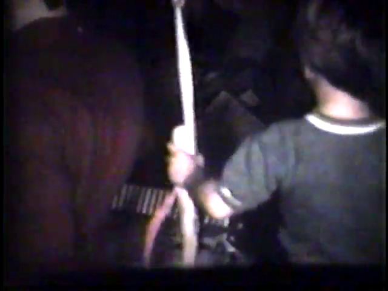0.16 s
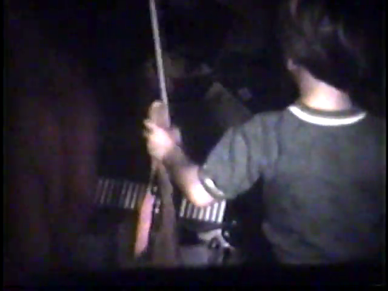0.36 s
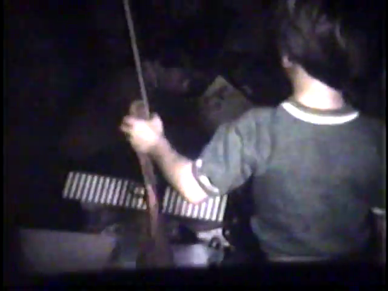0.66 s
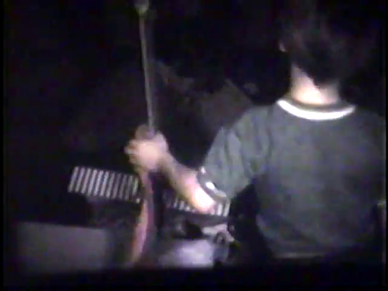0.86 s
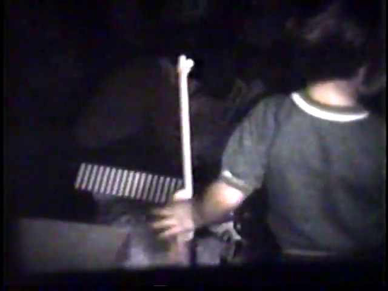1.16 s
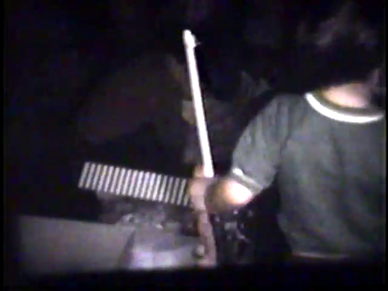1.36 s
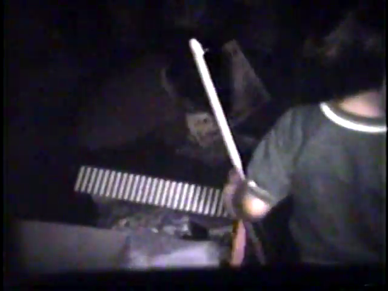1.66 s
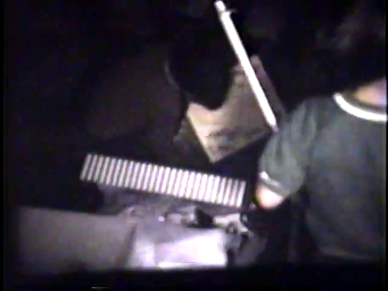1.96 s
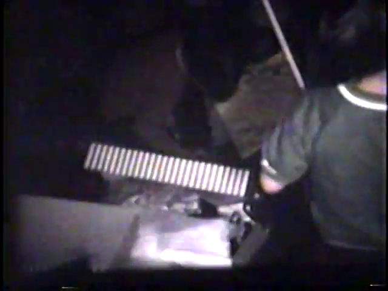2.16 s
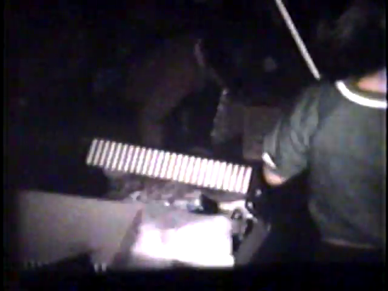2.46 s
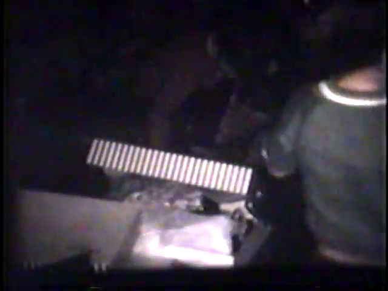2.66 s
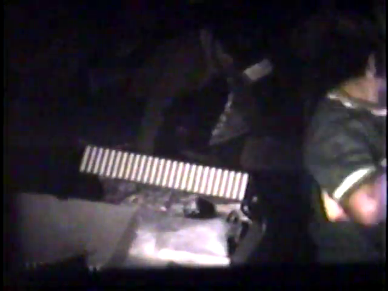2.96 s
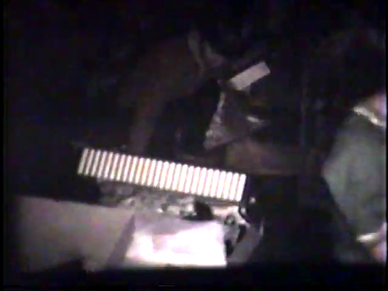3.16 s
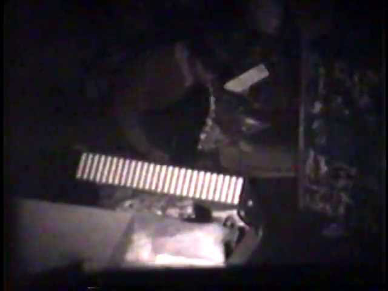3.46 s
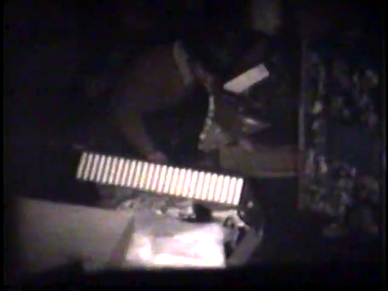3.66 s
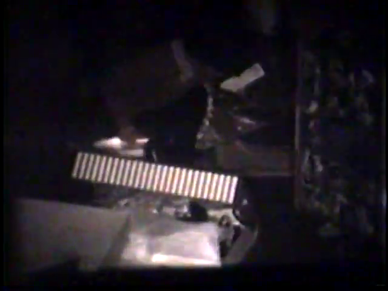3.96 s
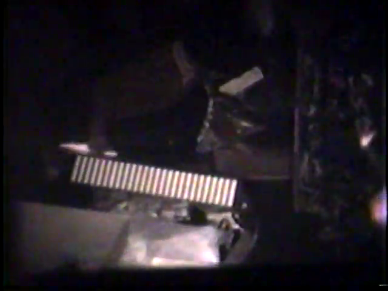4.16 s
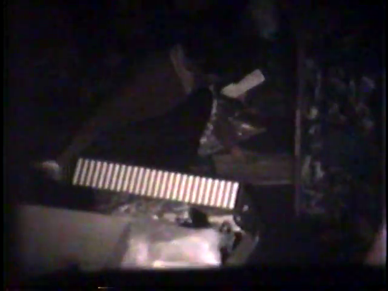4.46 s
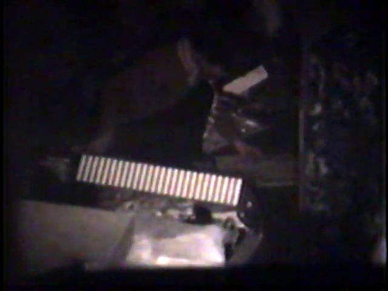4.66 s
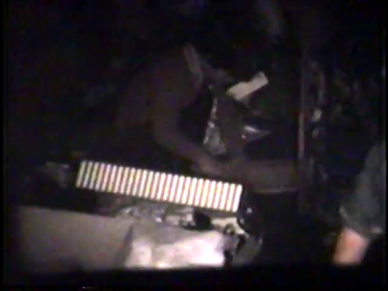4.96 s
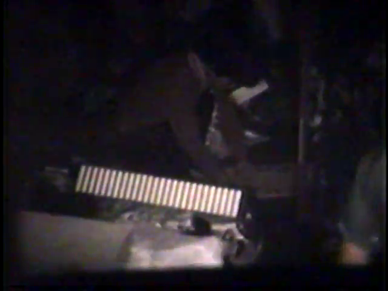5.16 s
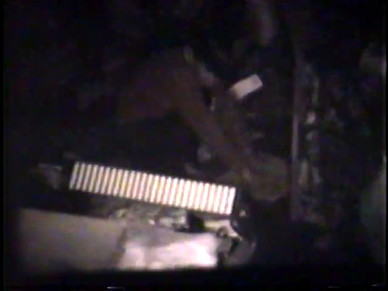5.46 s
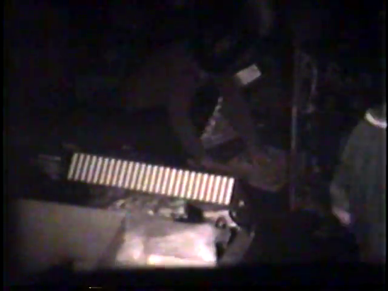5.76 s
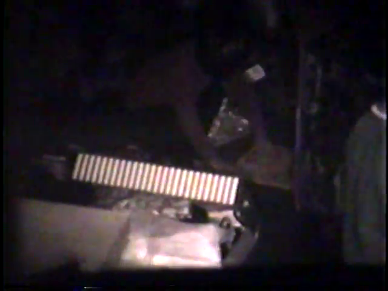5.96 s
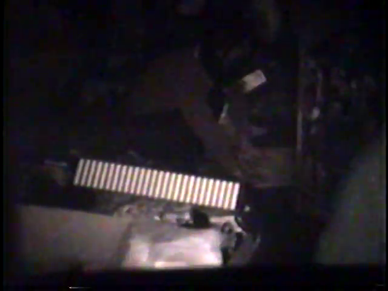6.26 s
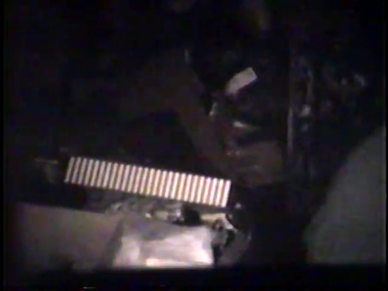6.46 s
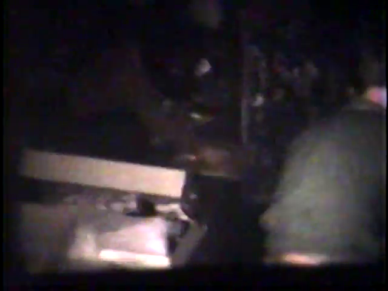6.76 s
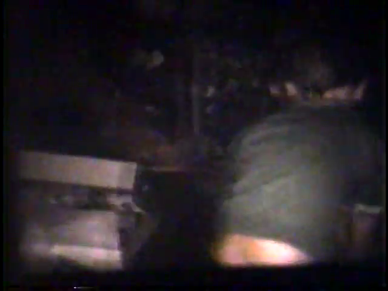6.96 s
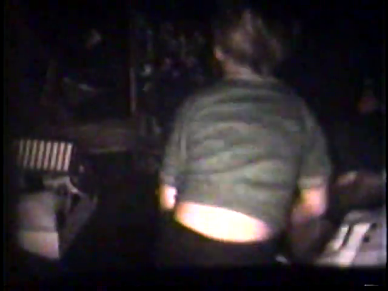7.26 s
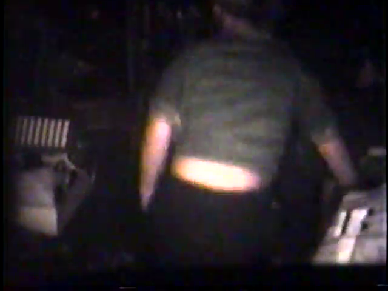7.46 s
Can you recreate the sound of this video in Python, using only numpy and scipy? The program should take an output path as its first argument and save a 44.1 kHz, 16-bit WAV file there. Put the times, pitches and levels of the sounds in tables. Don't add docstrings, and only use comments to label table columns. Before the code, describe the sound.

A small film projector runs at steady speed in a room, very close to a camcorder microphone. A rough motor hum with a fluttering casing rattle fills the foreground, with rapid identical clicks about seventeen times a second. Fan air hisses underneath, and a slight squeak swells about once a second. The mono sound is dulled on top and continues unchanged from start to finish.

```python
import sys
import numpy as np
from scipy import signal
from scipy.fft import rfft, irfft, next_fast_len
from scipy.io import wavfile

SR = 44100
rng = np.random.default_rng(int(sys.argv[2]) if len(sys.argv) > 2 else 0)


def boost_factor(decibels):
    exponent = np.asarray(decibels, float) / 20
    return 10 ** exponent


def transcribe(signal):
    frames = np.atleast_2d(signal).T
    limited = np.clip(frames, -1, 1)
    pcm = np.round(limited * 32767).astype(np.int16)
    wavfile.write(sys.argv[1], SR, pcm)


N = 335601

PULL_HZ, ROTOR_HZ, FRAME_HZ = 120.0115, 53.7728, 17.201
PULL_START_TURNS, ROTOR_START_TURNS = .29, -.32
ROTOR_BARS, FRAMES_PER_SPROCKET = 17, 18


def at_hz(points, hz):
    points = np.array(points)
    return np.interp(np.log(hz + 1), np.log(points[:, 0]), points[:, 1])


def drift(rate):
    r = np.exp(-80 * np.pi * rate / SR)
    noise = rng.standard_normal(N // 40 + 4002)
    slow = signal.lfilter([1], [1, -2 * r, r * r], noise)[4000:]
    slow = (slow - slow.mean()) / slow.std()
    return np.interp(np.arange(N) / 40, np.arange(len(slow)), slow)


def coloured(x, response):
    size = next_fast_len(N + 8192)
    hz = np.arange(size // 2 + 1) * SR / size
    return irfft(rfft(x, size) * response(hz), size)[:N] * np.sqrt(SR / 2)


def resonance(hz, centre_hz, width_hz, db):
    damping = 1j * hz * width_hz
    return -boost_factor(db) * (damping / (centre_hz ** 2 - hz ** 2 + damping)) ** 2


def ring(clicks, modes):
    out = np.zeros(N)
    for k, (hz, db, t60) in enumerate(modes):
        r = boost_factor(-60 / (t60 * SR))
        w = 2 * np.pi * hz / SR
        strength = (-1) ** (k // 3) * boost_factor(db) * np.sin(w)
        out += signal.lfilter([0, strength], [1, -2 * r * np.cos(w), r * r], clicks + 1e-18)
    return out


def motor_angle(pulls, turns):
    s = np.arange(N) / SR
    pull = PULL_HZ * s + PULL_START_TURNS
    rotor = ROTOR_HZ * s + ROTOR_START_TURNS
    return 2 * np.pi * (round(pulls) * pull + round(turns) * rotor)


# centre in Hz, width in Hz, level in dB per Hz.
CASING_PANELS = [(296, 98, -66), (440.4, 96, -64), (542.6, 50, -54), (740, 111, -63), (800, 85, -63),
                 (902, 81, -59.5), (1029, 35, -61), (1083.6, 39, -60), (1180, 59, -73), (1274.7, 40.6, -59),
                 (1519, 92, -57.5), (1706, 145, -67), (1880, 36.5, -63)]


def casing(hz, panels=CASING_PANELS):
    return sum(resonance(hz, *mode) * (-1) ** k for k, mode in enumerate(panels))


def side_tones(strong):
    size = next_fast_len(2 * N)
    spectrum = np.zeros(size // 2 + 1, complex)
    for turns in range(-8, 23):
        away = min(abs(turns), abs(turns - ROTOR_BARS) + 2, 5)
        for pulls in range(-8, 20):
            hz = pulls * PULL_HZ + turns * ROTOR_HZ
            chance, lag = rng.standard_normal(), rng.random()
            if 280 < hz < 1900 and (pulls, turns) not in strong:
                db = 11.0 - 1.42 * away + 2.5 * chance
                tone = abs(casing(hz)) * boost_factor(db) * np.exp(2j * np.pi * lag)
                spectrum[round(hz * size / SR)] = tone
    return irfft(spectrum, size)[:N] * size / np.sqrt(2)


# multiple of pull, multiple of rotor turn, level in dB rms.
MOTOR_TONES = [(2, 0, -45.3), (2, 1, -49.0), (3, 0, -39.3), (3, 1, -32.3), (4, -1, -36.6), (0, 8, -45.7),
               (3, 2, -43.5), (4, 0, -45.4), (4, 1, -37.4), (5, -1, -32.9), (6, -3, -50.0), (4, 2, -49.1),
               (5, 0, -38.8), (6, 0, -46.3), (7, -1, -46.8), (7, 0, -49.1), (6, 3, -44.5), (7, 1, -46.0),
               (8, -1, -47.6), (0, 19, -48.5), (9, -1, -46.8), (1, 18, -47.1), (13, -1, -44.0),
               (14, -3, -49.2), (14, -2, -49.2), (4, 19, -50.2), (11, 4, -52.3), (12, 2, -51.8),
               (8, 2, -51.0), (1, 8, -48.0)]
# multiple of pull added to the bar rate, level in dB rms.
ROTOR_BAR_TONES = [(-4, -50.5), (-3, -42.1), (-1, -50.8), (0, -45.1), (1, -46.9), (2, -50.6), (3, -49.7),
                   (5, -46.3)]
OPPOSED_TONES = [(2, 1), (4, 2), (6, 3), (4, 19), (14, -3), (12, 2)]


def hum():
    strong = MOTOR_TONES + [(pulls, ROTOR_BARS, db) for pulls, db in ROTOR_BAR_TONES]
    groups = np.zeros((4, N))
    panel_lag = rng.random(20)
    for k, (pulls, turns, db) in enumerate(strong):
        hz = pulls * PULL_HZ + turns * ROTOR_HZ
        opposed = (pulls, turns) in OPPOSED_TONES
        side_panel = abs(hz - 545) < 20 and turns < 4
        lag = .2 - .39 * side_panel - .25 * (hz < 300 or opposed)
        if hz > 610:
            lag = panel_lag[int(hz / PULL_HZ)]
        lag += .5 * opposed
        groups[k % 4] += np.sqrt(2) * boost_factor(db) * np.cos(motor_angle(pulls, turns) + 2 * np.pi * lag)
    wobbling = sum(group * boost_factor(0.14 * drift(2.6)) for group in groups)
    return wobbling + side_tones([row[:2] for row in strong])


def grains(per_s, spread_db):
    happens = rng.random(N) < per_s / SR
    size = boost_factor(spread_db * np.minimum(rng.exponential(1, N), 4))
    hits = happens * size * rng.choice([-1, 1], N)
    return hits / hits.std()


def sprocket_rub():
    turn = np.arange(N) / SR * FRAME_HZ / FRAMES_PER_SPROCKET
    before = (.515 - turn) % 1
    off = np.minimum(before, 1 - before)
    drag_db = 2.5 * np.exp(-before / 0.35)
    catch_db = 8.0 * np.exp(-off / .03)
    return boost_factor(0.2 + drag_db + catch_db + 0.64 * drift(4.6))


# multiple of pull, multiple of rotor turn, swing in dB, lag in turns.
BEARING_LEAN = [(0, 1, 1.7, 0), (1, -1, 2.2, 0), (1, -2, 1.8, 0), (1, 0, .7, -.15), (2, 1, .8, 0),
                (-7, 16, .4, 0), (2, -5, .7, .05), (3, -7, .7, .3), (-4, 9, .6, -.3), (5, -11, .8, -.4),
                (3, -6, .6, .1), (1, -3, .4, .4), (2, -4, .4, .2), (6, -13, .4, -.2)]
# centre in Hz, width in Hz, level in dB per Hz.
LAMP_COVER = [(2600, 380, -81), (3093, 41, -77), (3720, 500, -75), (4240, 940, -82), (5200, 120, -75.5),
              (6110, 390, -91.5), (6690, 210, -83.5), (7140, 150, -94), (7740, 170, -87),
              (8260, 205, -82.5), (9220, 370, -87.5)]
# frequency in Hz, level in dB per Hz.
LOOSE_CHATTER = [(150, -110), (1000, -78), (2000, -104), (2500, -76), (3300, -98.5), (5000, -77.5),
                 (5700, -97.5), (9600, -88), (10200, -100), (14000, -114)]


def rattle():
    lean_db = .6 * drift(8) + .5 * drift(3)
    for pulls, turns, db, lag in BEARING_LEAN:
        lean_db += db * np.cos(motor_angle(pulls, turns) + 2 * np.pi * lag)
    lean = boost_factor(lean_db) / np.sqrt(np.mean(boost_factor(lean_db) ** 2))
    contacts = lean * grains(6000, spread_db=2.5)
    heavy = coloured(contacts * lean ** (.3 - 1), casing)
    cover = coloured(contacts, lambda hz: casing(hz, LAMP_COVER))
    loose = lean ** 1.18 * grains(6000, spread_db=-3.0)
    chatter = coloured(loose, lambda hz: boost_factor(at_hz(LOOSE_CHATTER, hz)))
    squeak = coloured(sprocket_rub() * contacts, lambda hz: resonance(hz, 4830, 163, -69))
    return heavy + cover + chatter + squeak


# place in the frame from 0 to 1, then thud, gate plate, pin and lever levels in dB.
CLAW_CONTACTS = [(0.031, -60, -50, -67, -50), (.378, -32, -54, -43.5, -64), (.415, -27, -35.5, -36, -60),
                 (0.456, -29, -37, -65, -50), (.485, -37.5, -40.5, -59, -56), (.52, -33, -63, -47, -46),
                 (0.554, -29, -69, -59, -65), (0.721, -27, -52, -56, -41), (.855, -25, -41.5, -70, -42),
                 (.91, -24, -28.5, -62, -49), (.93, -31, -43, -47, -64), (.965, -47, -33, -44, -40)]
# frequency in Hz, level in dB, time to fall 60 dB in seconds.
THUD_MODES = [(836, -7, 0.044), (1150, -4, 0.019), (1367, -2, 0.0091)]
# frequency in Hz, level in dB, time to fall 60 dB in seconds.
PLATE_MODES = [(2078, -4, 0.045), (2125, -6.5, 0.011), (2254, -5, 0.033), (2622, -12.5, 0.031)]
# frequency in Hz, level in dB, time to fall 60 dB in seconds.
PIN_MODES = [(6110, -0.5, 0.01), (6640, -10.5, 0.01)]
# frequency in Hz, level in dB, time to fall 60 dB in seconds.
LEVER_MODES = [(3020, -0.5, 0.02)]


def claw():
    frames = np.arange(-1, int(N / SR * FRAME_HZ) + 1)
    wander_s = .0003 * drift(.5)
    out = np.zeros(N)
    for column, modes in enumerate((THUD_MODES, PLATE_MODES, PIN_MODES, LEVER_MODES)):
        clicks = np.zeros(N)
        for place, *levels_db in CLAW_CONTACTS:
            chance = rng.standard_normal((len(frames), 2))
            at = ((frames + place) / FRAME_HZ + .00002 * chance[:, 0]) * SR
            at = (at + wander_s[np.clip(at, 0, N - 1).astype(int)] * SR).astype(int)
            inside = (at >= 0) & (at < N)
            clicks[at[inside]] += boost_factor(levels_db[column] + 0.72 * chance[inside, 1])
        soft = signal.butter(4, 1.13 * max(modes)[0], fs=SR, output="sos")
        out += ring(signal.sosfilt(soft, clicks), modes)
    return signal.sosfilt(signal.butter(2, 500, "high", fs=SR, output="sos"), out)


# frequency in Hz, level in dB per Hz.
FAN_AIR = [(20, -70.5), (100, -84), (190, -80), (280, -68), (600, -70.5), (1000, -74), (2000, -74.5),
           (3000, -82.5), (5500, -88), (9600, -125), (10300, -102), (13000, -108), (15500, -122)]


def fan():
    return coloured(rng.standard_normal(N), lambda hz: boost_factor(at_hz(FAN_AIR, hz)))


def scene():
    return (hum() + rattle() + claw() + fan())[None]


# time in seconds, level in dB.
GAIN_JOLTS = [(0.049, -46), (0.239, -39), (0.299, -48), (0.543, -43), (1.51, -46), (1.69, -47),
              (2.008, -39), (2.375, -39), (3.283, -40), (3.668, -39), (4.073, -42), (4.563, -37),
              (4.707, -34), (5.52, -38), (6.076, -38), (6.249, -44), (6.765, -38), (6.809, -49),
              (7.445, -38)]


def gain_thump(x):
    kick = .3 * np.maximum(np.abs(x) - .13, 0)
    kick[[int((at + .022) * SR) for at, db in GAIN_JOLTS]] += boost_factor(np.array(GAIN_JOLTS)[:, 1] + 56.5)
    kick = signal.sosfilt(signal.butter(2, 120, fs=SR, output="sos"), kick)
    return signal.sosfilt(signal.butter(1, [5, 22], "band", fs=SR, output="sos"), kick)


# frequency in Hz, level in dB rms.
LEAK_TONES = [(29.97, -64), (60.003, -50), (89.92, -70), (119.88, -70), (120.025, -69), (149.84, -67),
              (180.01, -68), (15734.3, -96)]


def leakage():
    s = np.arange(N) / SR
    tones = sum(np.sqrt(2) * boost_factor(db) * np.sin(2 * np.pi * hz * s) for hz, db in LEAK_TONES)
    return tones + coloured(rng.standard_normal(N), lambda hz: resonance(hz, 15730, 300, -112))


# time in seconds, level in dB.
TAPE_TICKS = [
    (4.4925, -35),
    (3.553, -50),
]


def tape_ticks():
    ticks = np.zeros(N)
    ticks[[int(at * SR) for at, db in TAPE_TICKS]] = boost_factor(np.array(TAPE_TICKS)[:, 1])
    return ticks


def field_buzz():
    s = np.arange(N) / SR
    fields = np.diff(np.floor((s - .001) * 59.94), prepend=-1) * boost_factor(-45)
    return signal.sosfilt(signal.butter(2, [9500, 13000], "band", fs=SR, output="sos"), fields)


def low_pass(x):
    return signal.sosfilt(signal.butter(12, 15990, fs=SR, output="sos"), x)


def record(dry):
    x = signal.sosfilt(signal.butter(2, 10300, fs=SR, output="sos"), dry[0])
    rounded = .6 * np.tanh(x / 0.6)
    mix = rounded + gain_thump(x) + leakage() + tape_ticks() + field_buzz()
    return low_pass(mix[None])


dry = scene()
out = record(dry)
transcribe(out)
```